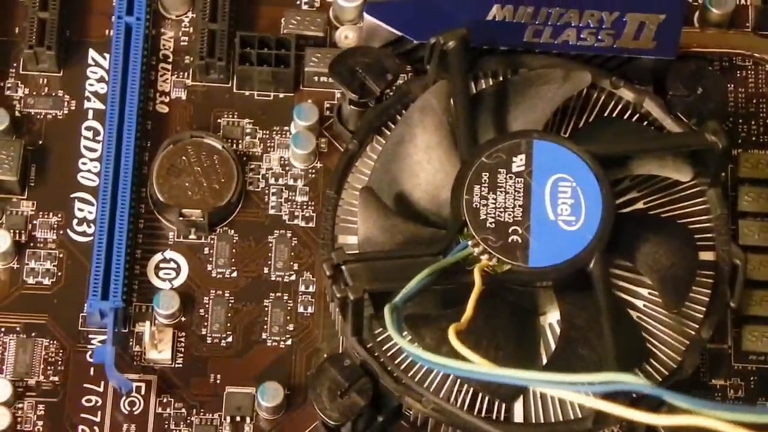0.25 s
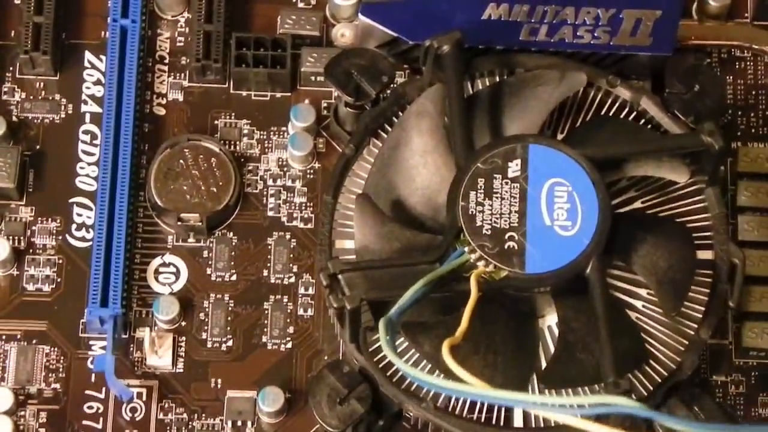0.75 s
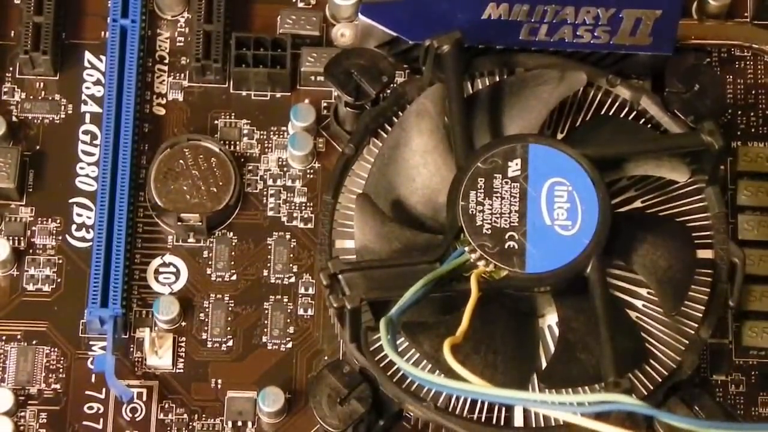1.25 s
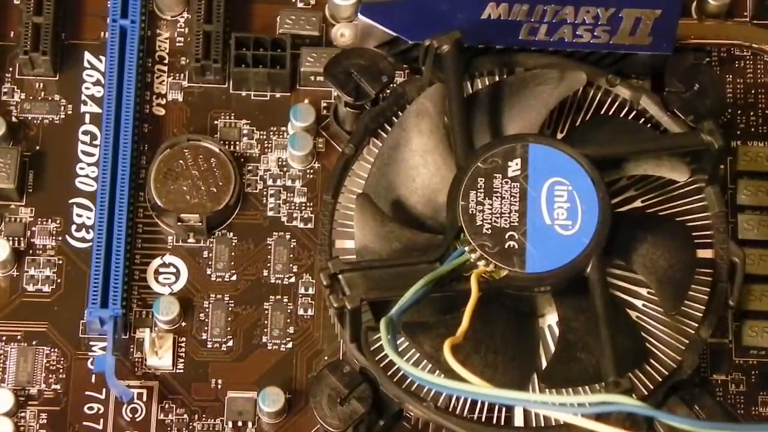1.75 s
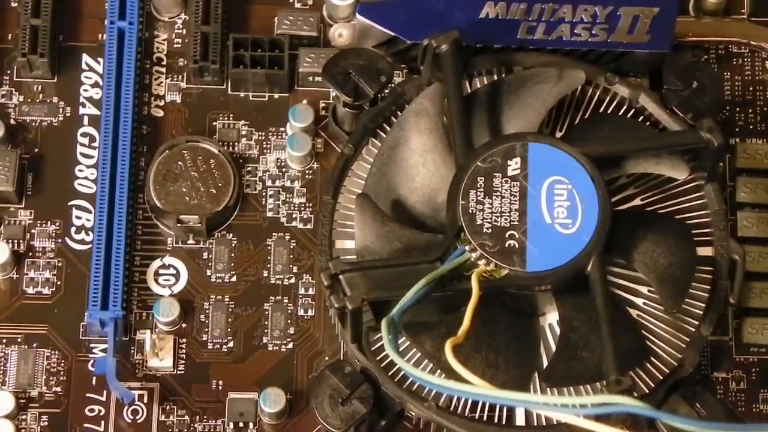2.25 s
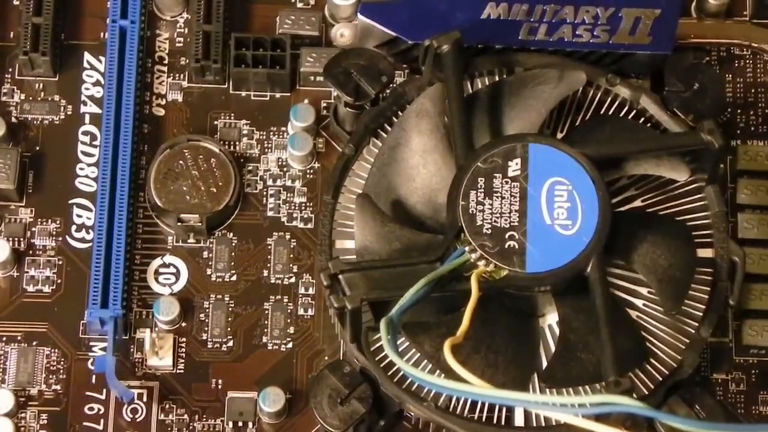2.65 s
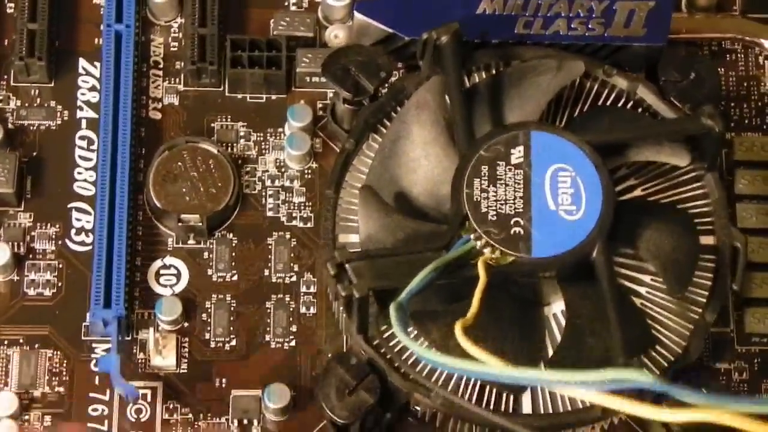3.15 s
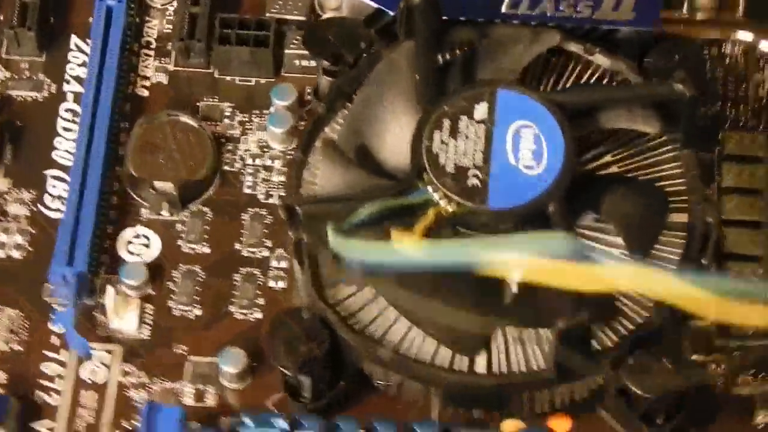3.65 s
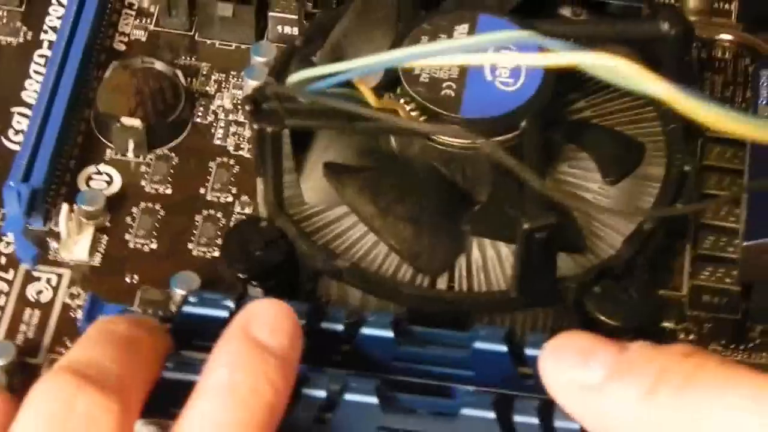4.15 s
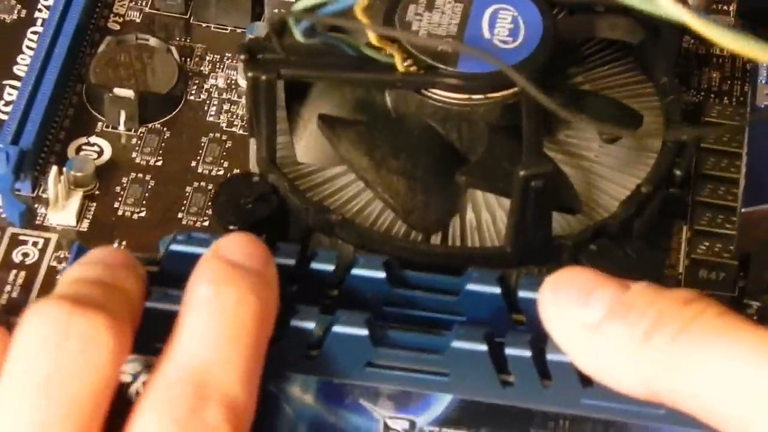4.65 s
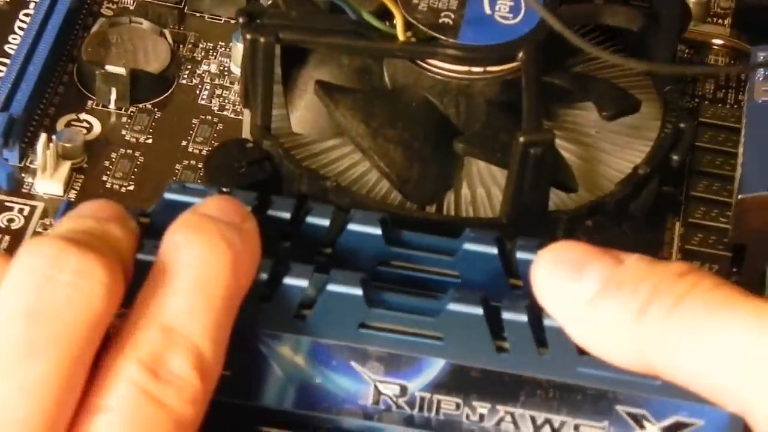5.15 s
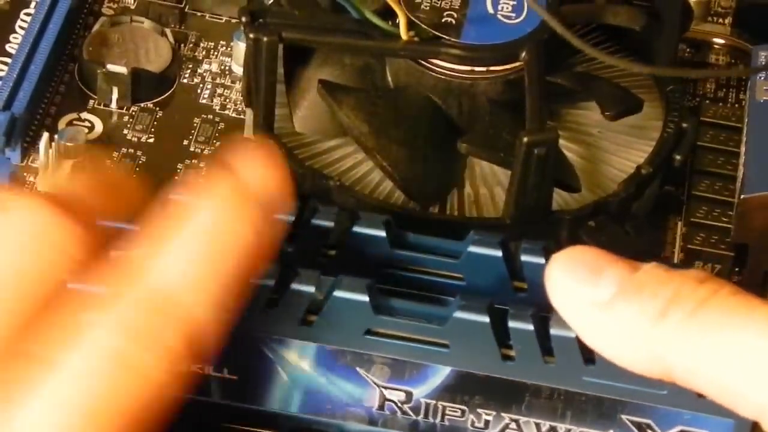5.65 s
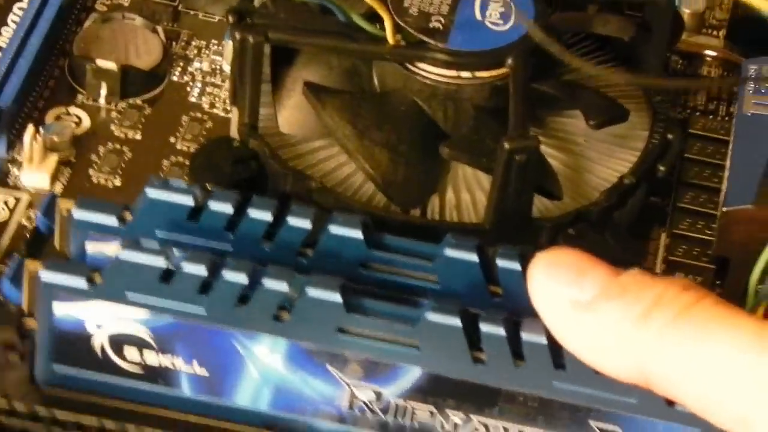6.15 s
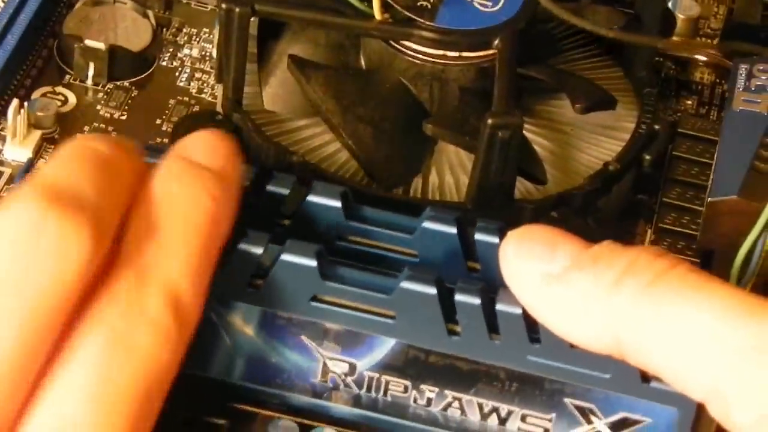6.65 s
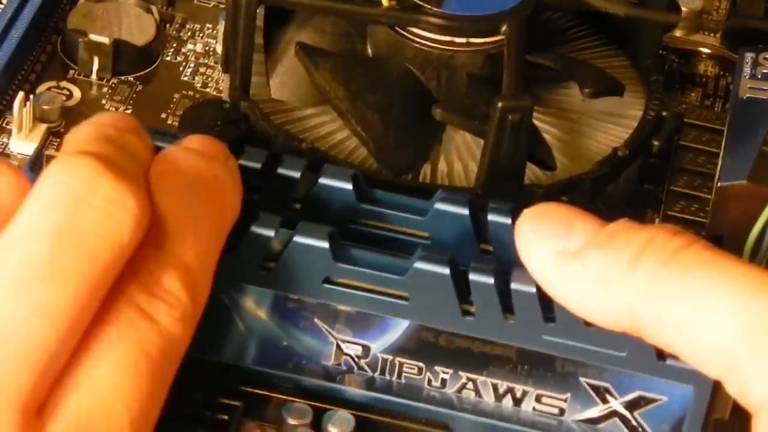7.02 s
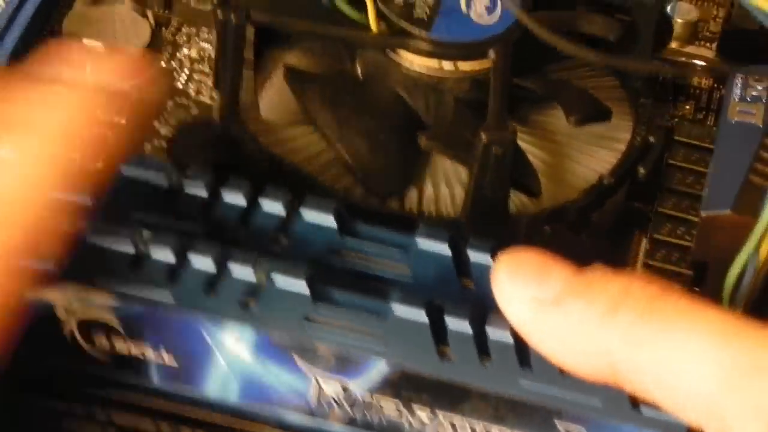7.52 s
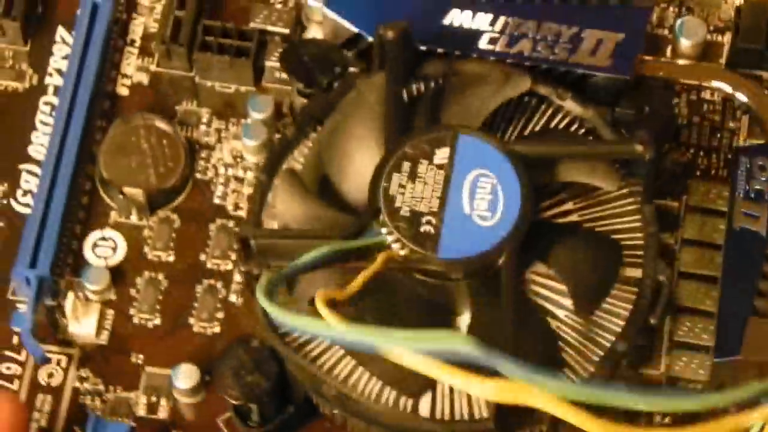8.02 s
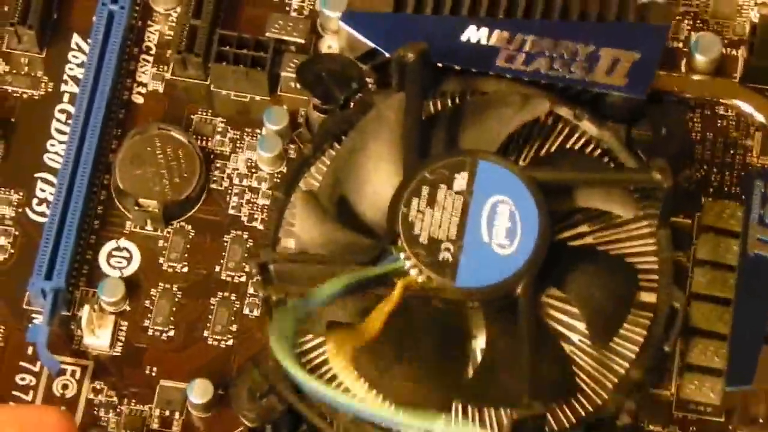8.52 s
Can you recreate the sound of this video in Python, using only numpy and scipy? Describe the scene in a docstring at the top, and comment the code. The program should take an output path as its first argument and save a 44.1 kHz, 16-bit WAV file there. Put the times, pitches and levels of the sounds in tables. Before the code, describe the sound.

Close handheld microphone in a small room, with faint mains hum and fan noise. Deep, uneven handling rumble surges throughout. Light finger ticks and a soft desk boom come first, then a cluster of dull board knocks with rubbing. A small slip leads to a bright, hard double latch snap, and later one more loud snap. A heavy microphone thump, knocks and tiny dry clicks finish.

```python
"""Plastic latches snap shut as hands press memory modules into a circuit board: rattles and blows ring modes.
The board knocks, parts click, fingers tick on metal fins (same method) and thin fins ring as damped sines.
Parts rub and squeak as swelling coloured or narrow-band noise; the desk top booms under the board. The
microphone is shaken (low noise) and bumped (damped sines). A small room answers with decaying noise tails, over
mains hum (sines) and fan noise."""
import sys
import numpy as np
from scipy import signal
from scipy.fft import rfft, irfft, next_fast_len
from scipy.io import wavfile
from scipy.ndimage import uniform_filter1d, map_coordinates

SR = 44100
rng = np.random.default_rng(int(sys.argv[2]) if len(sys.argv) > 2 else 0)


def store_wav(level_fs):
    """Save 16-bit WAV to argv[1]."""
    pcm = np.round(np.clip(np.atleast_2d(level_fs), -1, 1) * 32767)
    wavfile.write(sys.argv[1], SR, pcm.T.astype(np.int16))


N = 387198

# Event and mode levels are relative; contacts and filters scale them further.
# latch and slot snaps, small slips just before: start_s, board_db, module_db, fins_db, crack_db, contact_t60_s
SNAPS = [(5.261, -40, -36, -42, -45, 0.013), (5.2765, -30, -32.5, -41, -41, 0.0083),
         (5.447, -47, -46, -46, -46, 0.0088), (5.4553, -29, -44, -51, -60, 0.0061),
         (5.466, -18.5, -17.5, -11, -18, 0.027), (5.481, -22.5, -42, -28, -37, 0.0056),
         (7.301, -11, -15.5, -17.5, -19, 0.035)]
# dry plastic clicks near the microphone: start_s, board_db, module_db, part_db, spark_db, contact_t60_s
CLICKS = [(8.5518, -43, -41, -22, -27.5, 0.0064), (8.5975, -42, -53, -38, -46.5, 0.0062)]
# board on desk and cables: start_s, board_db, edge_db, fins_db, contact_t60_s
KNOCKS = [(0.6655, -24, -26, -44, 0.067), (0.719, -29, -35, -49, 0.016),
          (0.737, -32.5, -35.5, -52.5, 0.038), (2.169, -29, -44.5, -59, 0.051),
          (3.145, -24, -48, -65, 0.028), (3.155, -12, -39.5, -45, 0.071), (3.219, -24.5, -49, -47, 0.098),
          (3.274, -12, -36.5, -53, 0.036), (3.287, -14, -42, -59, 0.011), (3.348, -9, -39, -52, 0.046),
          (3.397, -18.5, -40, -56, 0.022), (3.522, -15, -17.5, -30, 0.021), (3.548, -21, -30, -54, 0.029),
          (3.574, -16, -24.5, -51, 0.037), (3.594, -36, -26, -43, 0.099), (3.699, -26, -38, -70, 0.044),
          (3.723, -36, -43, -67, 0.027), (3.762, -35, -43.5, -54, 0.03), (3.841, -29, -46, -57, 0.067),
          (3.865, -32.5, -43, -54, 0.043), (3.882, -49, -37.5, -57, 0.025), (3.893, -43, -41.5, -63, 0.02),
          (8.115, -20.5, -55, -56, 0.021), (8.136, -32.5, -48.5, -57, 0.052), (8.158, -31, -53, -55, 0.037),
          (8.184, -37, -43.5, -56, 0.017), (8.587, -24.5, -35, -55, 0.027),
          (8.629, -20.5, -28.5, -43, 0.087), (8.723, -30, -36, -53, 0.028), (8.753, -21.5, -38, -68, 0.068)]
# fingers and wires on fins: start_s, module_db, fins_db, crack_db
TICKS = [(0.0727, -42.5, -46, -46.5), (0.099, -39.5, -38, -40), (0.9223, -51, -49, -64),
         (1.07, -67, -61, -54), (2.2976, -48, -48, -58), (2.63, -47, -62, -51.5),
         (2.836, -40.5, -60, -45.5), (2.8944, -42.5, -51, -50), (2.9514, -59, -63, -52),
         (2.9674, -53, -64, -57), (3.0404, -52, -49, -58), (3.062, -55, -42, -51.5),
         (3.0862, -41, -45, -57), (3.108, -48, -35, -46.5), (3.9722, -44.5, -57, -60),
         (4.3824, -55, -59, -54), (4.4205, -64, -58, -56), (4.5504, -62, -58, -65), (4.4312, -57, -47, -52),
         (4.6788, -63, -59, -54.5), (4.7094, -51, -42, -41), (4.9182, -45.5, -56, -58),
         (5.825, -46, -36, -43), (6.0264, -40.5, -50, -65), (7.5822, -46.5, -61, -65),
         (7.605, -48, -47, -53), (7.9645, -34, -66, -61), (7.9932, -38, -49, -58), (8.3158, -40, -46, -58),
         (8.334, -44, -71, -41.5), (8.3834, -37, -60, -45), (8.4014, -39, -59, -52),
         (8.5744, -43, -55, -53), (8.611, -52, -52, -60), (8.6652, -32, -35, -51)]
# thin fin rings: start_s, level_db, pitch_hz, t60_s
PINGS = [(5.8262, -46, 5530, 0.14), (7.607, -53, 5520, 0.14)]
# sliding strokes: peak_s, rise_20db_s, fall_20db_s, dull_db, bright_db
RUB_STROKES = [(.1, 0.014, 0.11, -49.5, -52.5), (1.092, .08, 0.029, -78, -68),
               (2.646, 0.038, 0.03, -57, -57.5), (2.836, 0.0075, 0.095, -51, -51.5),
               (3.116, .06, 0.01, -45, -54), (3.162, 0.017, 0.023, -35, -64), (3.276, 0.15, 0.24, -48, -63),
               (4.54, 0.43, 0.32, -60.5, -63), (5.835, .01, .08, -64, -55), (5.9, 0.048, 0.073, -55, -56),
               (8.34, 0.094, 0.069, -62, -57), (8.385, 0.13, 0.096, -48.5, -60),
               (8.597, 0.012, 0.0089, -41, -43.5), (8.632, 0.0054, 0.052, -38, -46),
               (8.77, 0.3, 0.059, -51.5, -55)]
# skin on smooth parts: start_s, length_s, centre_hz, width_hz, level_db
SQUEAKS = [(0.114, 0.015, 1410, 142, -50), (0.123, 0.042, 1046, 117, -50.5),
           (1.06, 0.028, 3900, 300, -60.5), (3.095, 0.023, 6160, 500, -50), (3.098, 0.026, 3460, 397, -53),
           (5.848, 0.069, 3370, 353, -54.5), (5.872, 0.031, 2160, 200, -56), (8.633, .145, 4880, 497, -59)]
# desk top booms: peak_s, rise_20db_s, fall_20db_s, level_db
DRAG_STROKES = [(.19, .15, 0.2, -36.5), (.706, .05, 0.051, -27), (.795, .1, 0.044, -29.5),
                (3.17, .1, .1, -38), (3.29, .2, 0.13, -40), (3.528, .025, 0.15, -25),
                (3.66, .1, 0.045, -32), (8.13, .03, 0.22, -23), (8.46, .25, 0.085, -28.5),
                (8.62, .05, 0.16, -25.5), (8.78, .1, 0.09, -22)]
# unsteady hands: time_s, shake_db, flutter_db
SHAKE = [(0, -24, -46), (.3, -23, -41), (.48, -38.5, -60), (.6, -26, -40), (1.3, -31.5, -43),
         (1.8, -22, -44), (1.96, -40.5, -52), (2.15, -22, -47), (2.6, -40.5, -58), (3.0, -33.5, -47),
         (3.6, -29.5, -40), (4.2, -29, -38.5), (5.3, -31.5, -52.5), (5.7, -26, -35.5), (6.6, -35.5, -48),
         (7.4, -28.5, -51), (7.9, -26, -32), (8.45, -32.5, -47.5), (8.78, -24.5, -33)]
# lurches of the hands: peak_s, shake_db, flutter_db
LURCHES = [(0.022, -8, -42), (.17, -15, -18.5), (.38, -21, -28.5), (.55, -20, -36), (0.728, -6.5, -22),
           (.89, -20.5, -36), (1.2, -30, -49), (1.421, -14.5, -34), (1.6, -21.5, -32), (1.721, -14, -29),
           (1.822, -10.5, -30), (2.06, -22.5, -36), (2.2, -19.5, -26.5), (2.348, -25, -26.5),
           (2.73, -46, -38), (3.05, -20, -40), (3.44, -20.5, -45), (3.55, -13, -46), (3.62, -21.5, -24),
           (3.73, -25, -27), (3.87, -24, -28.5), (3.992, -18.5, -30), (4.15, -18.5, -48), (4.5, -22.5, -31),
           (4.751, -26, -33), (5.39, -38, -49), (5.68, -20, -34), (5.768, -11.5, -27), (5.96, -17, -37),
           (6.062, -11, -44), (6.14, -22, -41), (6.479, -19, -28), (6.7, -23.5, -50.5), (7.19, -18, -34.5),
           (7.35, -42, -36), (7.771, -16, -43), (7.879, -11.5, -24), (8.059, -18.5, -23.5),
           (8.344, -17, -40), (8.6, -18, -25.5), (8.706, -26, -20)]
# microphone bumps: start_s, thud_db, thud_hz, thud_t60_s, low_tone_db, high_tone_db
BUMPS = [(4.153, -45, 100, .05, -17.5, -25.5), (4.5085, -10.5, 81, 0.039, -34, -39),
         (4.524, -19.5, 158, 0.075, -48, -50), (7.9946, -0.5, 100.8, 0.086, -5.5, -22.5),
         (8.005, -31, 110, 0.054, -26, -29.5), (8.117, -25, 126, 0.2, -39, -47)]
# microphone housing tones, low then high: pitch_hz, t60_s
HOUSING_TONES = [(286, 0.0069), (500, .04)]

# free board modes: centre_hz, width_hz, level_db
BOARD_MODES = [(271.4, 63, -1.5), (431, 61, -1), (687, 86, -4.5)]
# board edge modes: centre_hz, width_hz, level_db
EDGE_MODES = [(827, 296, 10), (1112, 100, 2.5), (1290, 280, -15), (1970, 830, 7), (2730, 1720, 0.5)]
# seated module and board modes: centre_hz, width_hz, level_db
LATCH_MODES = [(387, 480, -11), (699, 120, 1), (876, 90, -7), (1183, 320, -7)]
# module modes: centre_hz, width_hz, level_db
MODULE_MODES = [(2020, 700, 1.5), (2490, 204, 6), (2583, 240, 6)]
# metal fin modes: centre_hz, width_hz, level_db
FIN_MODES = [(3840, 1100, -5.5), (4840, 630, 6.5), (5000, 940, 3.5), (6030, 740, 0.5)]
# bright crack modes: centre_hz, width_hz, level_db
CRACK_MODES = [(7900, 4700, 14), (9840, 450, 2), (13600, 10000, -4)]
# small clicking part modes: centre_hz, width_hz, level_db
CLIP_MODES = [(3660, 620, -4), (4980, 700, -0.5)]
# bright edge of clicks and ticks: centre_hz, width_hz, level_db
SPARK_MODES = [(8060, 3000, 2), (13700, 2900, 1.5)]

# dull rubbing spectrum: freq_hz, relative_db
DULL_SPECTRUM = [(300, -30), (700, -1), (1100, 1), (2100, -2), (3000, -15), (5000, -35)]
# bright rubbing spectrum: freq_hz, relative_db
BRIGHT_SPECTRUM = [(1500, -37), (2600, -5.5), (3400, 1), (4800, -9), (6000, -16.5), (10000, -13.5),
                   (16000, -33)]
# desk boom spectrum: freq_hz, relative_db
BOOM_SPECTRUM = [(70, -39), (105, -5), (125, 3.5), (145, -7.5), (190, -8.5), (300, -27.5)]
# microphone shake spectrum: freq_hz, relative_db
SHAKE_SPECTRUM = [(8, -11), (18, 10.5), (30, 4.5), (45, -3.5), (62, -16.5), (90, -43), (200, -120)]
# microphone flutter spectrum: freq_hz, relative_db
FLUTTER_SPECTRUM = [(30, -69), (45, -8), (60, 23), (80, 7.5), (105, 2), (160, -31), (300, -120)]
# room decay: freq_hz, t60_s
ROOM_DECAY = [(300, 0.32), (800, 0.35), (2100, 0.24), (5500, 0.23), (14600, 0.13)]
# mains hum, nominal levels: pitch_hz, rms_db
HUM = [(120, -49.5), (178, -57.5), (240, -64), (320, -61.5), (360, -66)]
# fan spectrum: freq_hz, relative_db
FAN_SPECTRUM = [(60, -49), (100, -6.5), (180, -3.5), (300, -12), (600, -13.5), (850, -20), (1200, -23.5),
                (2000, -26), (4000, -36), (8000, -41.5), (15000, -44.5), (16400, -63)]

SEATED_BODIES = LATCH_MODES, MODULE_MODES, FIN_MODES, CRACK_MODES
CLICK_BODIES = LATCH_MODES, MODULE_MODES, CLIP_MODES, SPARK_MODES
KNOCK_BODIES = BOARD_MODES, EDGE_MODES, FIN_MODES, CRACK_MODES
TICK_BODIES = LATCH_MODES, MODULE_MODES, FIN_MODES, SPARK_MODES
CONTACT_CORNER_RATIO = 1.3  # contact roll-off over the top mode
KNOCK_CRACK_DB = -14.5  # re fins
TICK_BOARD_DB, TICK_T60_S = -3.5, .012  # board re module; contact decay
TREMBLE_DB, TREMBLE_PER_S = 2.5, 22
LURCH_RISE_20DB_S, LURCH_FALL_20DB_S = 0.043, 0.049
SHAKE_EVENNESS, FLUTTER_EVENNESS, BOOM_EVENNESS = .45, .87, 1.0
SETTLE_S, DROOP, HEAD_TURNS = .0024, .37, .15  # bump pitch settling; start phase
FAN_DB = -49.5  # nominal rms
TOP_HZ = 16300


def snaps():
    """Latch rattle with a blow shortly after onset rings the seated module."""
    return contacts(SNAPS, SEATED_BODIES, trims_db=(16.0, 15.3, 12.7, 14.5),
                    blow=1.16, rise_s=0.00037, lead_s=0.001411)


def clicks():
    """Short plastic contacts ring a small part."""
    return contacts(CLICKS, CLICK_BODIES, trims_db=(23, 21, 16.3, 14),
                    blow=0.93, rise_s=.0003, lead_s=0.00045)


def knocks():
    """Board contacts, mostly rattle, ring board, edge and fins."""
    events = [(s, board, edge, fins, fins + KNOCK_CRACK_DB, t60)
              for s, board, edge, fins, t60 in KNOCKS]
    return contacts(events, KNOCK_BODIES, trims_db=(15.06, 22.26, 12.8, 25.0), blow=0.42, rise_s=0.0019)


def tick_events():
    """Ticks with the board driven under the module."""
    return [(s, module + TICK_BOARD_DB, module, fins, crack, TICK_T60_S)
            for s, module, fins, crack in TICKS]


def ticks():
    """Light finger and wire contacts on the fins; some thin fins ring on."""
    taps = contacts(tick_events(), TICK_BODIES, trims_db=(18.6, 15.0, 11.3, 17.8),
                    blow=0.18, rise_s=0.0016)
    return taps + rings(PINGS, settle_s=.001, droop=0, head_turns=0)


def rubbing():
    """Skin and wire slide in small uneven slips."""
    dull_gain, bright_gain = swells(RUB_STROKES)
    slips = amp(2 * wobble(120) + 3.1 * wobble(30))
    dull = dull_gain * unit(slips * noise(DULL_SPECTRUM))
    return dull + bright_gain * unit(slips * noise(BRIGHT_SPECTRUM))


def squeaks():
    """Skin squeaks: narrow noise bands that swell and fade."""
    out = np.zeros(N)
    for start_s, length_s, hz, width_hz, db in SQUEAKS:
        t = np.arange(round(length_s * SR)) / SR
        flicker = uniform_filter1d(rng.standard_normal((2, len(t))), round(SR / width_hz), axis=1)
        phase = 2 * np.pi * hz * t
        tone = flicker[0] * np.sin(phase) + flicker[1] * np.cos(phase)
        out[round(start_s * SR):][:len(t)] += amp(db) * unit(tone) * np.sqrt(np.sin(np.pi * t / length_s))
    return out


def desk():
    """The dragged board booms in the desk top."""
    return soft(swells(DRAG_STROKES)[0] * steady_waver(BOOM_SPECTRUM, BOOM_EVENNESS), 440)


def handling():
    """Hands and air shake the microphone as low noise; bumps add tones."""
    wander_db = TREMBLE_DB * np.array([wobble(TREMBLE_PER_S), wobble(TREMBLE_PER_S)])
    tremble = amp(np.array(curves(SHAKE)) + wander_db)
    strokes = [(s, LURCH_RISE_20DB_S, LURCH_FALL_20DB_S, *db) for s, *db in LURCHES]
    shake_gain, flutter_gain = np.hypot(tremble, swells(strokes))
    shake = shake_gain * steady_waver(SHAKE_SPECTRUM, SHAKE_EVENNESS)
    flutter = flutter_gain * steady_waver(FLUTTER_SPECTRUM, FLUTTER_EVENNESS)
    return soft(shake + flutter, 210) + bumps()


def bumps():
    """Each bump is a low thud that also rings the housing."""
    tones = [(s, db, hz, t60) for s, db, hz, t60, *_ in BUMPS]
    for s, _, _, _, *levels_db in BUMPS:
        tones += [(s, db, *tone) for db, tone in zip(levels_db, HOUSING_TONES)]
    return soft(rings(tones, SETTLE_S, DROOP, HEAD_TURNS), 590)


def room_blows():
    """Snaps and ticks as the room gets them: blows alone, their rattles evened out from all sides."""
    snap_blows = contacts(SNAPS, SEATED_BODIES, trims_db=(15.6, 16, 10.4, 16), blow=1, rise_s=1, rattle=0)
    tick_blows = contacts(tick_events(), TICK_BODIES, trims_db=(23, 11, 6.6, 15),
                          blow=1, rise_s=1, rattle=0)
    return snap_blows + tick_blows


def room(x):
    """Noise tails decay at a speed set by frequency; overlapping stretches get tails of their own."""
    step, delay = SR // 4, 150  # samples
    out = np.zeros(N + 2 * SR)
    fade = signal.get_window("hann", 2 * step)
    x = np.pad(x, (step, 2 * step))
    for start in range(0, N + step, step):
        hz, t, z = signal.stft(rng.standard_normal(SR // 2), SR, nperseg=256)
        decay = amp(-60 * t / along(ROOM_DECAY, hz)[:, None])
        tail = signal.istft(z * decay, SR, nperseg=256)[1]
        wet = signal.fftconvolve(fade * x[start:start + 2 * step], tail / np.linalg.norm(tail))
        out[start + delay:][:len(wet)] += wet
    return out[step:step + N]


def background():
    """Fan noise and mains hum, slightly unsteady in level, the hum also in phase."""
    t = np.arange(N) / SR
    hum = np.zeros(N)
    for hz, db in HUM:
        gain = np.sqrt(2) * amp(db + 2.0 * wobble(5.4))
        hum += gain * np.sin(2 * np.pi * hz * t + 0.31 * wobble(9))
    return hum + amp(FAN_DB + 0.15 * wobble(3.28)) * noise(FAN_SPECTRUM)


def contacts(events, bodies, trims_db, blow, rise_s, lead_s=0, rattle=1):
    """A rough rattle with a blow lead_s into it rings four bodies per contact."""
    force = np.zeros((4, N + SR))
    t = np.arange(SR // 4) / SR
    for start_s, *levels_db, t60_s in events:
        envelope = amp(-60 * t / max(t60_s, .002)) * (1 - np.exp(-t / rise_s))
        burst = envelope * rng.standard_normal((4, len(t)))
        burst *= rattle / np.linalg.norm(burst, axis=1, keepdims=True)
        burst[:, round(lead_s * SR)] += blow * np.array([1, -1, 1, -1])
        force[:, round(start_s * SR):][:, :len(t)] += amp(levels_db)[:, None] * burst
    return sum(amp(db) * filtered(f[:N], modes(body)) for db, f, body in zip(trims_db, force, bodies))


def modes(table, order=2):
    """Causal resonances of alternating sign; a soft contact drives little above the top one."""
    corner_hz = CONTACT_CORNER_RATIO * table[-1][0]

    def response(f):
        ring = sum((-1) ** k * amp(db) * 1j * f * width / (centre ** 2 - f * f + 1j * f * width)
                   for k, (centre, width, db) in enumerate(table))
        return ring / (1 + 1j * f / corner_hz) ** order
    return response


def rings(events, settle_s, droop, head_turns):
    """Damped tones; droop starts the pitch high, head_turns makes the first swing a sudden push."""
    out = np.zeros(N + SR)
    t = np.arange(SR // 3) / SR
    for start_s, db, hz, t60_s in events:
        turns = head_turns + hz * (t + droop * settle_s * (1 - np.exp(-t / settle_s)))
        attack = 1 - np.exp(-t / 0.00025)
        out[round(start_s * SR):][:len(t)] += amp(db - 60 * t / t60_s) * np.sin(2 * np.pi * turns) * attack
    return out[:N]


def swells(rows):
    """Stroke gains that climb to a peak and fade, summed in power; one curve per level column."""
    t = np.arange(0, N + 64, 32) / SR
    power = 0
    for peak_s, rise_s, fall_s, *db in rows:
        drop_db = 20 * np.maximum((peak_s - t) / rise_s, (t - peak_s) / fall_s)
        power = power + amp(np.array(db)[:, None] - drop_db) ** 2
    return np.array([np.interp(np.arange(N) / SR, t, np.sqrt(p)) for p in power])


def steady_waver(spectrum, evenness):
    """Noise with part of its own chance swelling evened out, rms 1."""
    x = noise(spectrum)
    return unit(x / (np.abs(signal.hilbert(x)) + 0.11) ** evenness)


def noise(spectrum):
    """Coloured noise of rms 1."""
    return unit(filtered(rng.standard_normal(N), lambda hz: amp(along(spectrum, hz))))


def filtered(x, response):
    """Apply a complex frequency response, keeping the level of white noise."""
    m = next_fast_len(N + SR // 2)
    gain = response(np.fft.rfftfreq(m, 1 / SR))
    return irfft(rfft(x, m) * unit(np.abs(gain)) * np.exp(1j * np.angle(gain)), m)[:N]


def soft(x, edge_hz, order=4):
    """Causal low-pass."""
    return signal.sosfilt(signal.butter(order, edge_hz, fs=SR, output="sos"), x)


def wobble(knots_per_s):
    """Smooth random curve."""
    knots = rng.standard_normal(int(N * knots_per_s / SR) + 4)
    return map_coordinates(knots, [np.arange(N) * knots_per_s / SR])


def curves(rows):
    """One value per sample for each column after the time."""
    time_s, *columns = np.transpose(rows)
    return [np.interp(np.arange(N) / SR, time_s, c) for c in columns]


def along(points, hz):
    """Interpolate (Hz, value) points on a log frequency axis."""
    f, v = np.transpose(points)
    return np.interp(np.log(hz + 1), np.log(f + 1), v)


def unit(x):
    """Scale to rms 1."""
    return x / np.sqrt(np.mean(x ** 2) + 1e-20)


def amp(db):
    """dB to gain."""
    return 10 ** (np.asarray(db) / 20)


def scene():
    """Contacts in the room, over desk, handling and background."""
    click = clicks()
    near = knocks() + rubbing() + squeaks()
    direct = snaps() + ticks() + click + near
    wet = room(room_blows() + amp(-1.0) * near + amp(-16) * click)
    return (direct + wet + desk() + handling() + background())[None]


def record(dry):
    """The microphone chain keeps nothing above its band limit."""
    m = next_fast_len(N + SR // 2)
    passed = np.fft.rfftfreq(m, 1 / SR) < TOP_HZ
    return irfft(rfft(dry, m) * passed, m)[:, :N]


dry = scene()
out = record(dry)
store_wav(out)
```